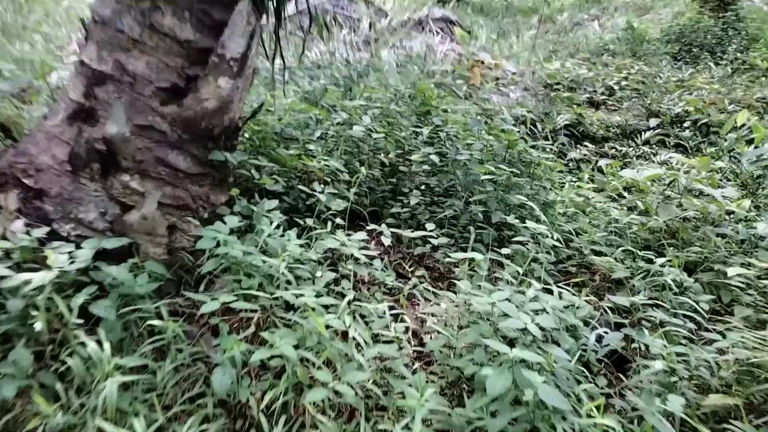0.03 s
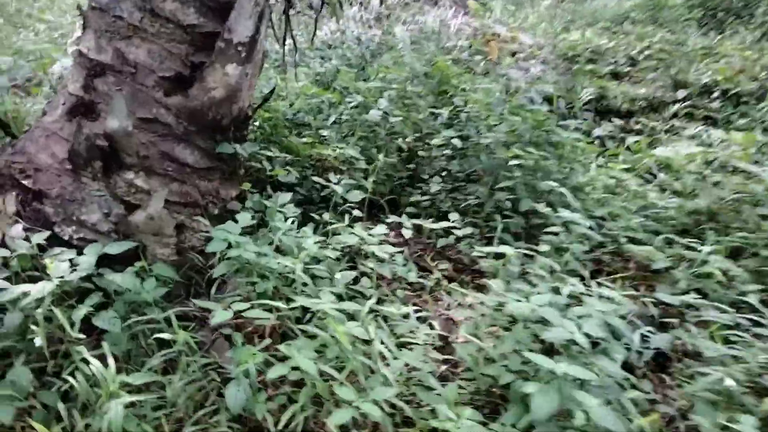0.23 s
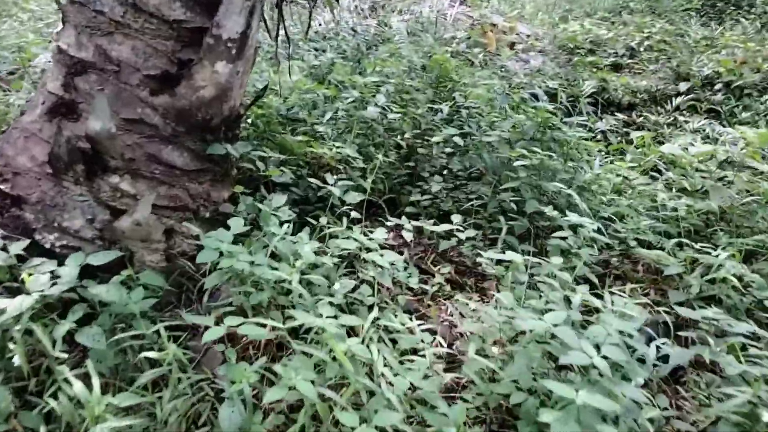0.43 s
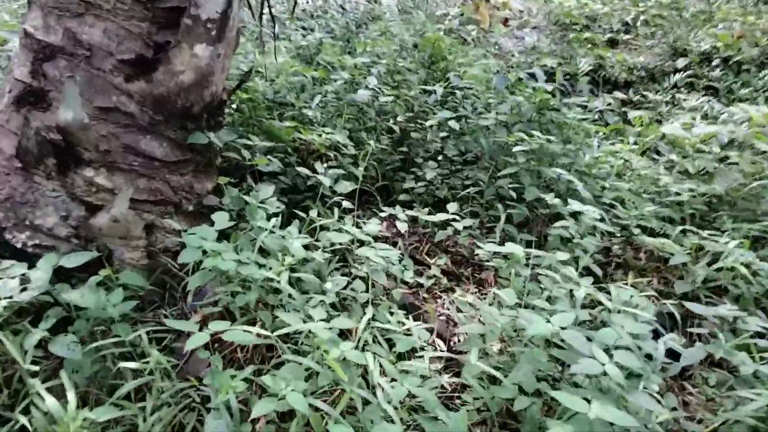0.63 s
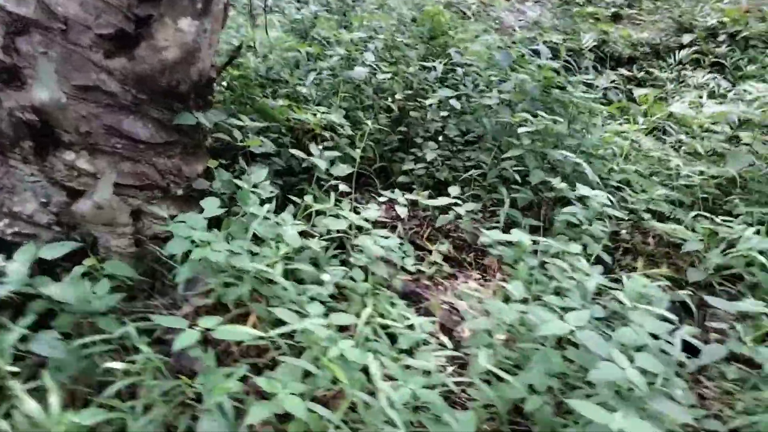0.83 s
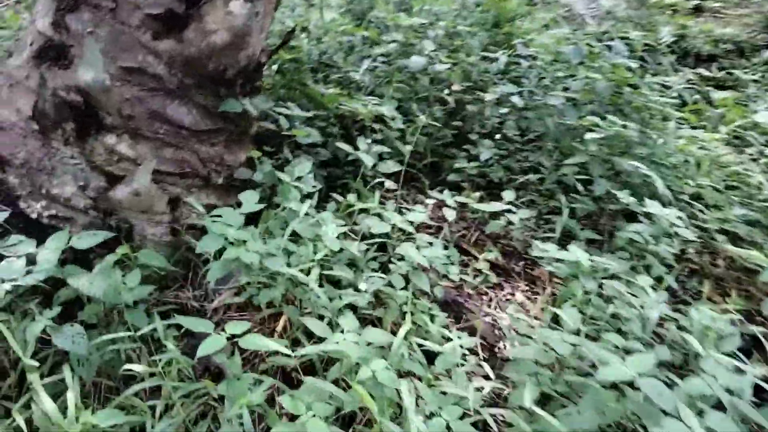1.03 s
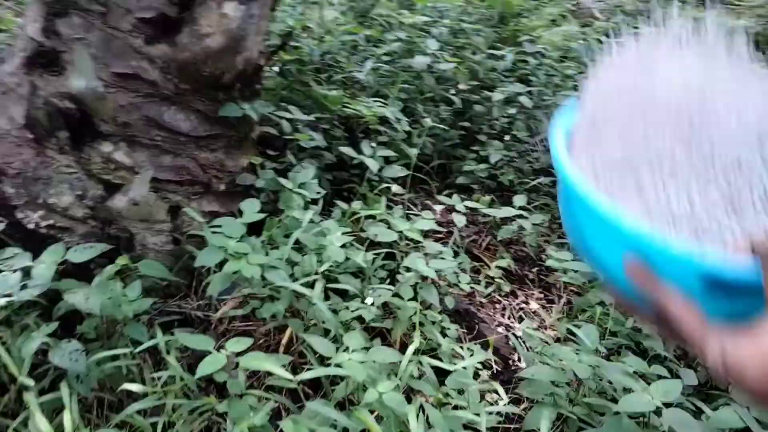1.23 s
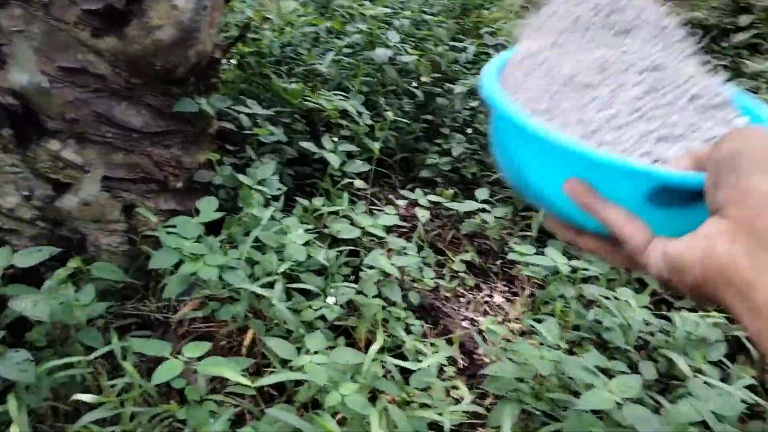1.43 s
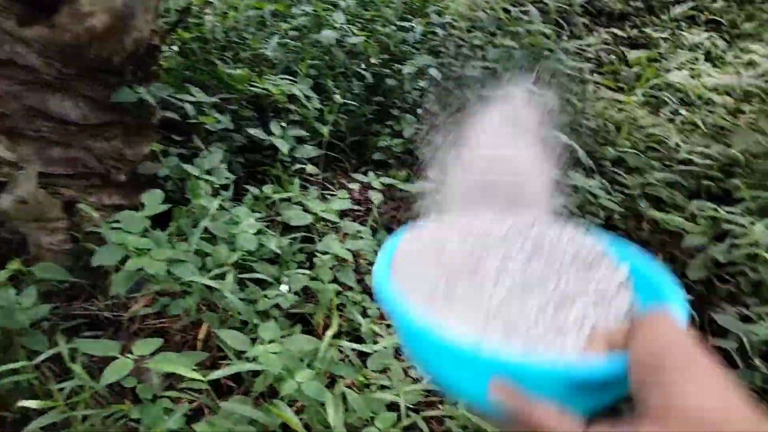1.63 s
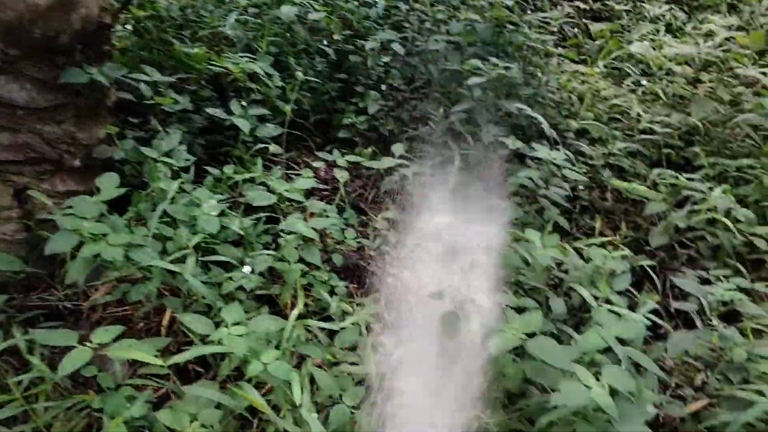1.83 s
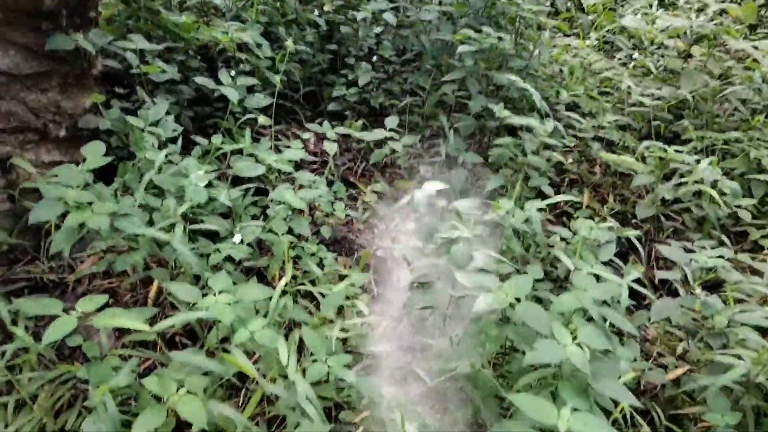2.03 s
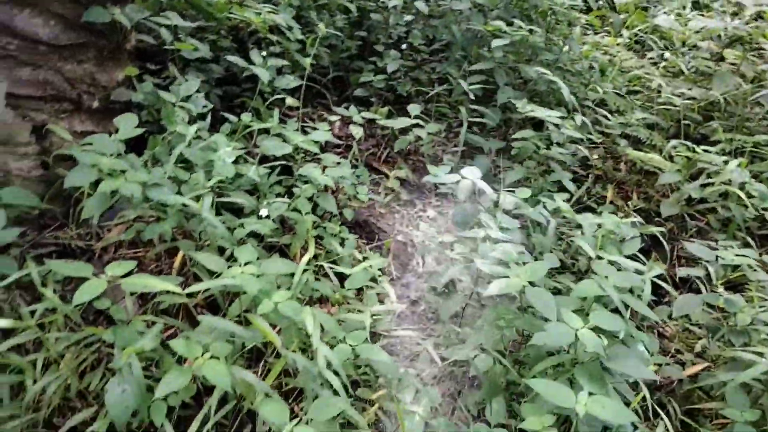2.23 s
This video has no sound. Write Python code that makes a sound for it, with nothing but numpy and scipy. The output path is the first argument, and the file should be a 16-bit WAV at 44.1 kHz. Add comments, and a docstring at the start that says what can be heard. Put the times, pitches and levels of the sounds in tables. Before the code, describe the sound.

Granules patter and trickle down through leaves, thinning out, then the load crunches in a plastic bowl and a fling lands as a bright hissing spray; faint insects outdoors, close mono microphone.

```python
"""Granules trickle through leafy undergrowth, close by, while insects shrill all around over faint air.
The load shifts in a plastic bowl with a crunch, an insect buzzes briefly past, then a fling of
fertilizer lands as a hissing spray. Granules are dense random impacts or single strikes that ring with
a colour; insects are pulsed bands of noise, the buzz is a few harmonics, and the sound is mono."""
import sys
import numpy as np
from scipy import signal
from scipy.fft import rfft, irfft, next_fast_len
from scipy.io import wavfile
from scipy.ndimage import map_coordinates

SR = 44100
rng = np.random.default_rng(int(sys.argv[2]) if len(sys.argv) > 2 else 0)


def dump_mix(stems):
    """Bounce the given channels to the path in sys.argv[1] as a 16-bit WAV at rate SR."""
    frames = np.atleast_2d(stems).T  # one column per channel
    limited = np.clip(frames, -1, 1)  # hard clip at full scale
    pcm = np.round(limited * 32767).astype(np.int16)
    wavfile.write(sys.argv[1], SR, pcm)


N = 100018  # length [samples]

# Colours set only the balance of frequencies; strengths are the relative force of single impacts.
# granules trickling through leaves, before flutter and a small lift:
# (time [s], level of the patter [dB], level of its dull body [dB])
TRICKLE_LEVELS = [(0, -38.5, -53), (.06, -46.5, -62), (.2, -55, -66), (.31, -49.5, -59), (.42, -51.5, -65),
                  (.52, -48, -65), (.6, -42, -57.5), (.66, -43, -60.5), (.75, -49, -63), (.81, -52.5, -70),
                  (.95, -54, -68.5), (1.12, -59, -71), (1.3, -60.5, -78), (1.48, -76, -77), (1.6, -78, -96)]
# colour of the bright patter on leaves: (frequency [Hz], level [dB])
PATTER_COLOUR = [(2500, -38), (4200, -19), (6000, -11), (7500, -2), (8900, 2), (10200, -3), (12100, -13),
                 (13500, -9), (15500, -6.5)]
# colour of the dull body under the patter: (frequency [Hz], level [dB])
BODY_COLOUR = [(100, -20.5), (300, -11.5), (700, -10), (1200, -6), (1900, 1.5), (2700, -4), (3500, -4.5),
               (4200, -13.5), (7000, -24.5)]
# single granules striking leaves: (time [s], strength [dB])
LEAF_TICKS = [(.0488, -19), (.0503, -18), (.0518, -18.5), (.107, -21.5), (.1325, -33), (.528, -26),
              (.597, -26), (.774, -29), (.78, -31), (.9768, -32), (1.014, -33), (1.0665, -30.5),
              (1.1603, -25), (1.234, -25), (1.923, -17), (2.151, -28), (2.212, -26), (2.238, -31)]
# insect bands: (centre [Hz], width [Hz], level [dB], mean pulse rate [1/s], pulse depth [dB])
INSECT_BANDS = [(4460, 167, -67, 39, 3), (5400, 410, -63, 60, 2.5), (6787, 420, -58.5, 81, 2),
                (13540, 700, -66.5, 90, 2), (15400, 700, -68.5, 90, -3)]
# colour of still outdoor air: (frequency [Hz], level [dB])
AIR_COLOUR = [(20, -0.5), (50, -1.5), (100, -8.5), (250, -16.5), (600, -21), (1300, -21), (2000, -20.5),
              (3000, -26.5), (3700, -16), (5000, -13.5), (9000, -14), (11500, -20), (15500, -20)]
# soft knocks of the bowl, ringing with the body colour: (time [s], strength [dB])
BOWL_KNOCKS = [(.0505, -33), (.9765, -42), (.9815, -41), (1.014, -48)]
# soft low bumps of handling: (time [s], strength [dB])
HANDLING_BUMPS = [(.873, -56), (.905, -59.5), (1.035, -55), (1.068, -57.5), (1.668, -55.5), (1.693, -56.5),
                  (1.725, -56.5)]
# colour of the bumps: (frequency [Hz], level [dB])
BUMP_COLOUR = [(40, -4), (130, 1.5), (330, -1.5), (600, -12.5), (1500, -31), (4000, -48)]
# the load shifting in the bowl: (time [s], level [dB])
CRUNCH_LEVELS = [(1.14, -74), (1.165, -53), (1.18, -43), (1.187, -34), (1.197, -34.5), (1.203, -40),
                 (1.21, -37.5), (1.222, -38), (1.245, -52), (1.3, -58), (1.37, -80)]
# granules clacking against the bowl: (time [s], strength [dB])
BOWL_CLACKS = [(1.1552, -41), (1.1684, -20.5), (1.1724, -21), (1.1828, -21), (1.1857, -25), (1.188, -18.5),
               (1.1926, -20), (1.1955, -25), (1.198, -19.5), (1.2098, -22), (1.211, -24), (1.234, -34),
               (1.2535, -40), (1.471, -41.5), (1.505, -41)]
# colour of granules scraping the bowl: (frequency [Hz], level [dB])
SCRAPE_COLOUR = [(250, -31.5), (600, -21.5), (880, -9.5), (1150, -12), (2000, -2.5), (2800, -8), (3900, 1),
                 (5100, 2), (6200, -1.5), (7200, -1.5), (8300, -4.5), (9400, 1.5), (11200, -13.5),
                 (15500, -16)]
# colour of the bowl's hollow: (frequency [Hz], level [dB])
HOLLOW_COLOUR = [(500, -30), (900, -17.5), (1400, -12.5), (1800, -1), (2100, 2), (2400, -9), (2800, -25),
                 (5000, -36.5)]
# harmonics of the passing insect: (multiple of the pitch, relative level [dB])
FLY_HARMONICS = [(1, 0.5), (2, -8), (3, -20), (4, -19), (5, -12.5)]
# three layers of the fling, each one row: (nominal peak [dB], first granules below the peak [dB],
# swell exponent, sag while the bulk lands [dB], fall [dB/s], lingering share [dB], its fall [dB/s])
HISS_SHAPE = (-27, 21.5, 1.33, 0, 122.5, -13, 21)
SLAP_SHAPE = (-35.5, 17, 2, 6.5, 124, -10.5, 21)
THUD_SHAPE = (-58, 1.5, 0.5, 4, 130, -29, 35)
# colour of the hiss on the leaves: (frequency [Hz], level [dB])
HISS_COLOUR = [(2000, -28.5), (3500, -16), (5000, -13), (6500, -7.5), (8000, -1.5), (9300, 1), (11300, -6),
               (12600, -3), (14000, -3.5), (15500, -2)]
# colour of the slap on the leaves: (frequency [Hz], level [dB])
SLAP_COLOUR = [(300, -33), (750, -8.5), (1100, -10.5), (1500, 0), (2050, 1), (2400, -1), (2750, -1),
               (3300, -11), (4000, 2), (5000, -3), (7000, 1), (10000, -11), (15000, -19)]
# colour of the thud on the soil: (frequency [Hz], level [dB])
THUD_COLOUR = [(50, -15), (150, -3.5), (300, -2.5), (500, -7), (750, 0), (1400, -4.5), (3000, -26)]


def amp(db):
    """Decibels to linear gain."""
    return 10 ** (np.asarray(db) / 20)


def unit(x):
    """Scale a signal to rms 1."""
    return x / np.sqrt(np.mean(x ** 2) + 1e-20)


def clock():
    """Time of every sample [s]."""
    return np.arange(N) / SR


def away_from(moment):
    """Seconds left before a moment and seconds passed after it, each zero on the other side."""
    t = clock()
    return np.maximum(moment - t, 0), np.maximum(t - moment, 0)


def along(points, hz):
    """Read (frequency, value) points on a log frequency axis."""
    f, v = np.transpose(points)
    return np.interp(np.log(hz + 1), np.log(f + 1), v)


def curves(rows):
    """One value per sample for each column after the time."""
    s, *cols = np.transpose(rows)
    return [np.interp(clock(), s, c) for c in cols]


def wobble(rate):
    """A smooth random curve with rate knots a second."""
    return map_coordinates(rng.standard_normal(1024), [clock() * rate], mode="wrap")


def filtered(x, response):
    """Multiply the spectrum by a gain that depends on frequency."""
    size = next_fast_len(N + SR // 2)
    gain = response(np.fft.rfftfreq(size, 1 / SR))
    return irfft(rfft(x, size) * gain, size)[..., :N]


def ring(colour, size=2048):
    """Causal, minimum-phase impulse response of a colour, with energy 1."""
    log_gain = np.log(amp(along(colour, np.fft.rfftfreq(size, 1 / SR))))
    cepstrum = irfft(log_gain)
    # folding the cepstrum forward puts the energy at the start
    cepstrum[1:size // 2] *= 2
    cepstrum[size // 2 + 1:] = 0
    response = irfft(np.exp(rfft(cepstrum)))
    return response / np.linalg.norm(response)


def grains(colour, rate, spread_db):
    """Random impacts, rate a second and of scattered size, each ringing with the colour; rms 1."""
    hit = rng.random(N) < rate / SR
    scatter_db = spread_db * np.clip(rng.standard_normal(N), -2, 2)
    sizes = amp(scatter_db) * rng.choice([-1, 1], N)
    impacts = hit * sizes / np.sqrt(rate)  # a denser rain is not louder by itself
    return unit(signal.fftconvolve(impacts, ring(colour))[:N])


def strikes(rows, colour, t60, rattle):
    """Single impacts: a sharp contact and a rattle decaying 60 dB in t60 share the energy of the blow."""
    out = np.zeros(N + SR)
    t = np.arange(SR // 20) / SR
    response = ring(colour)
    for s, db in rows:
        push = rattle * rng.standard_normal(len(t)) * amp(-60 * t / t60)
        push[0] = 1  # the contact itself
        hit = signal.fftconvolve(push, response)
        hit = hit / np.linalg.norm(hit) / np.abs(response).max()
        out[round(s * SR):][:len(hit)] += amp(db) * hit
    return out[:N]


def trickle():
    """Granules sift down from leaf to leaf as dense small impacts; a few strike harder."""
    patter_db, body_db = curves(TRICKLE_LEVELS)
    flutter_db = 0.85 * wobble(69.96)
    patter = amp(patter_db + flutter_db + 1.5) * grains(PATTER_COLOUR, rate=9500, spread_db=4)
    body = amp(body_db + flutter_db + 1.4) * grains(BODY_COLOUR, rate=4000, spread_db=4)
    ticks = strikes(LEAF_TICKS, PATTER_COLOUR, t60=0.0071, rattle=0.66)
    return patter + body + ticks


def insects():
    """Narrow bands of distant shrilling, each pulsing at its own slightly unsteady rate."""
    out = np.zeros(N)
    for hz, width, db, rate, depth_db in INSECT_BANDS:
        noise = rng.standard_normal(N)
        band = unit(filtered(noise, lambda f: np.exp(-0.5 * ((f - hz) / width) ** 2)))
        pulse = np.sin(2 * np.pi * rate * clock() + 1.3 * wobble(17))
        out += amp(db) * unit(band * amp(depth_db * pulse))
    return out


def air():
    """A faint rumble and hush: steady noise in the colour of the air."""
    hush = filtered(rng.standard_normal(N), lambda hz: amp(along(AIR_COLOUR, hz)))
    return amp(-61) * unit(hush)


def handling():
    """The bowl is carried along: soft short knocks and slower-decaying low bumps."""
    knocks = strikes(BOWL_KNOCKS, BODY_COLOUR, t60=0.015, rattle=0.66)
    bumps = strikes(HANDLING_BUMPS, BUMP_COLOUR, t60=0.042, rattle=0.5)
    return knocks + bumps


def bowl():
    """The load slips: sharp clacks over a crunch, and the hollow answers as the granules settle."""
    crunch_db, = curves(CRUNCH_LEVELS)
    crunch = amp(crunch_db) * grains(SCRAPE_COLOUR, rate=6000, spread_db=4)

    clack_t60 = 0.0077  # s
    clacks = strikes(BOWL_CLACKS, SCRAPE_COLOUR, clack_t60, rattle=0.11)
    # each clack also rings the hollow
    hollow_clacks = amp(-15.5) * strikes(BOWL_CLACKS, HOLLOW_COLOUR, clack_t60, rattle=0.088)

    rise, fall, settle_fall = 403, 520, 97  # dB/s
    before, after = away_from(1.21)
    swell = amp(-39 - rise * before)
    # a quick fall, with a weaker share that settles more slowly
    decay = amp(-fall * after) + amp(-12 - settle_fall * after)
    answer = swell * decay * grains(HOLLOW_COLOUR, rate=4600, spread_db=3.5)
    return crunch + clacks + hollow_clacks + answer


def fly():
    """A small insect's wing buzz, harmonics of an unsteady pitch, comes nearer and darts off."""
    pitch_hz, approach, retreat = 201, 80, 480  # mean Hz, dB/s, dB/s
    phase = 2 * np.pi * np.cumsum(pitch_hz * (1 + 0.011 * wobble(25.1))) / SR
    buzz = unit(sum(amp(level) * np.sin(round(k) * phase) for k, level in FLY_HARMONICS))
    before, after = away_from(1.655)
    return amp(-66.5 - approach * before - retreat * after) * buzz


def shower(peak_db, first_db, swell, sag_db, fall, linger_db, linger_fall, onset_db_per_s=800):
    """Gain of a landing cloud: it swells to the bulk, may sag as that lands, falls away and lingers."""
    first_s, bulk_s, landed_s = 1.767, 1.8846, 1.93  # first granules, bulk arrives, bulk has landed
    t = clock()
    arrived = np.clip((t - first_s) / (bulk_s - first_s), 0, 1)
    landed = np.clip((t - bulk_s) / (landed_s - bulk_s), 0, 1)
    before, _ = away_from(first_s)
    _, after = away_from(landed_s)
    onset_db = -onset_db_per_s * before
    swell_db = -first_db * (1 - arrived ** swell)
    tail = np.hypot(amp(-fall * after), amp(linger_db - linger_fall * after))
    return amp(peak_db + onset_db + swell_db - sag_db * landed) * tail


def fling():
    """Thrown granules hiss on the leaves, slap them and thud on the soil; a louder hiss is denser."""
    hiss_gain = shower(*HISS_SHAPE)
    rate = 4500 + 11000 * hiss_gain / hiss_gain.max()  # impacts/s, shared by hiss and slap
    flutter = amp(0.6 * wobble(120))
    hiss = hiss_gain * flutter * grains(HISS_COLOUR, rate, spread_db=4.5)
    slap = shower(*SLAP_SHAPE) * grains(SLAP_COLOUR, rate, spread_db=2.5)
    thud = shower(*THUD_SHAPE) * grains(THUD_COLOUR, rate=1500, spread_db=3.5)
    return hiss + slap + thud


def scene():
    """All layers add up in the middle, the same in both channels."""
    mid = trickle() + insects() + air() + handling() + bowl() + fly() + fling()
    return np.array([mid, mid])


def record(dry):
    """A steep band limit: nothing passes from 15850 Hz up."""
    return filtered(dry, lambda hz: hz < 15850)


dry = scene()
out = record(dry)
dump_mix(out)
```